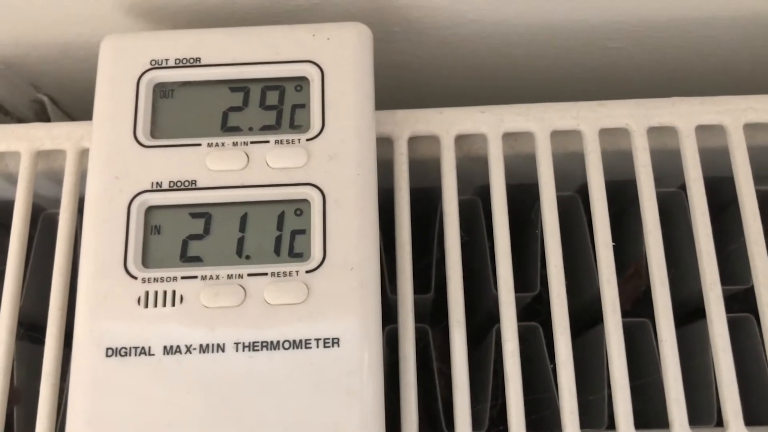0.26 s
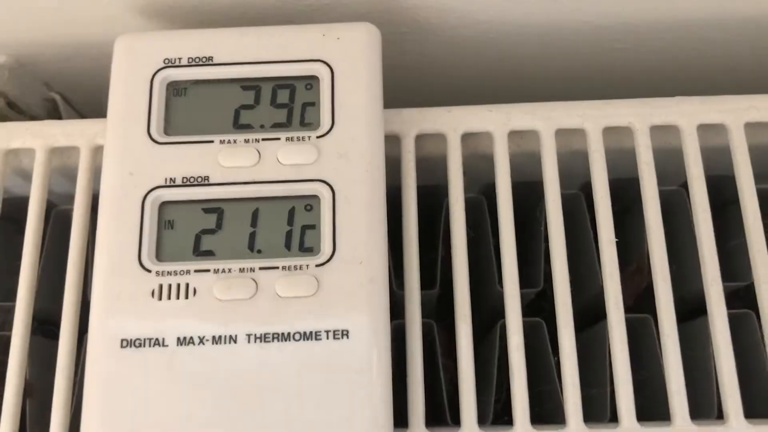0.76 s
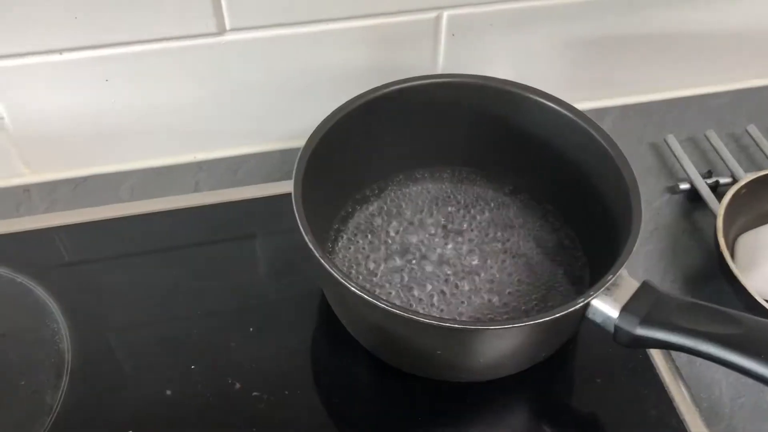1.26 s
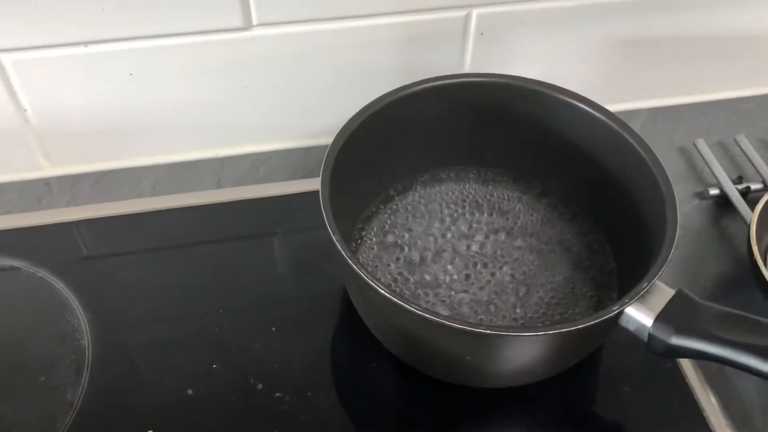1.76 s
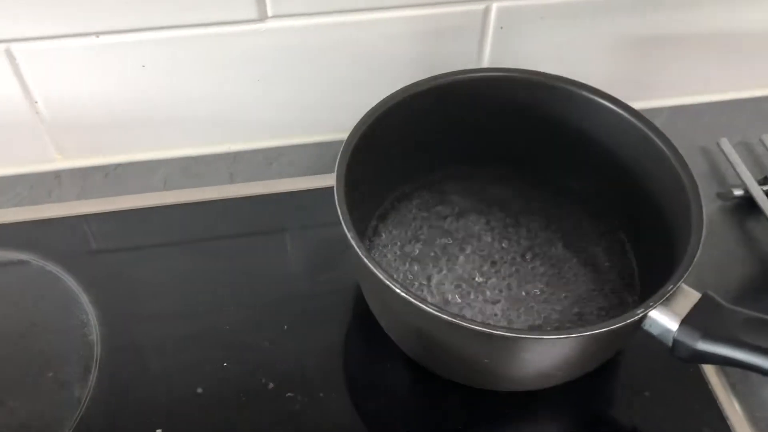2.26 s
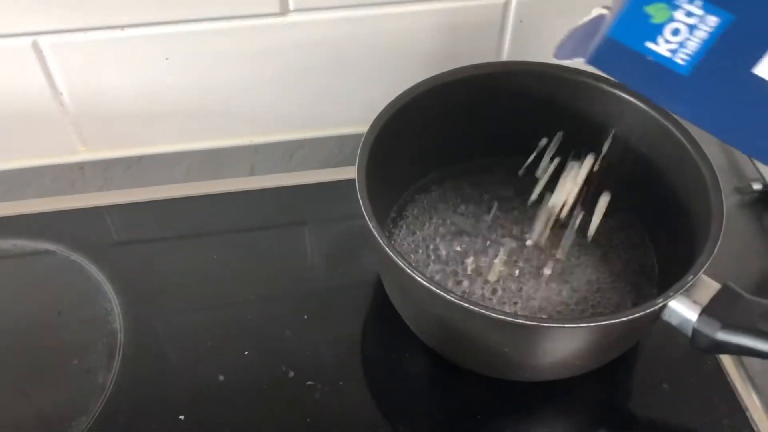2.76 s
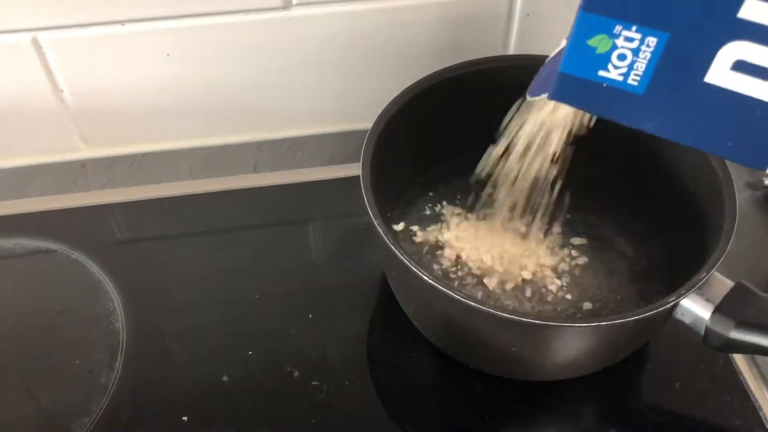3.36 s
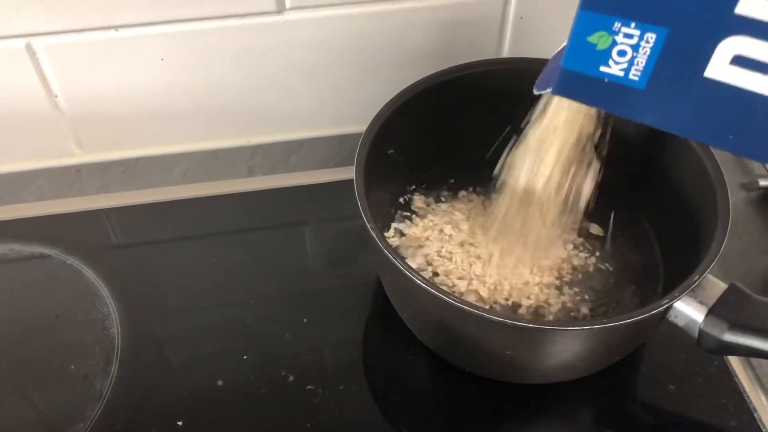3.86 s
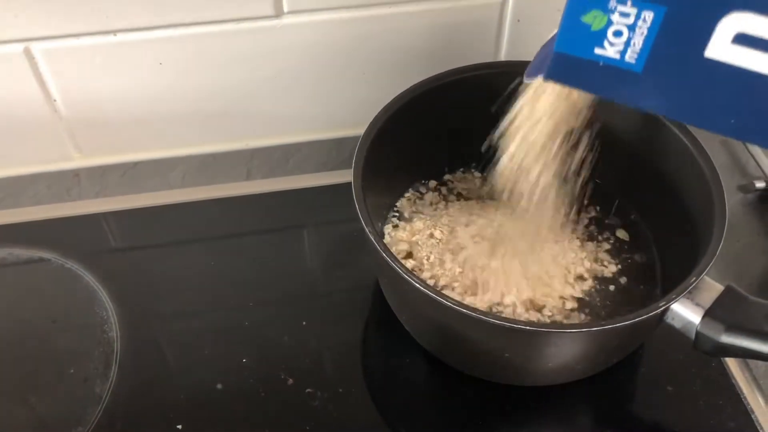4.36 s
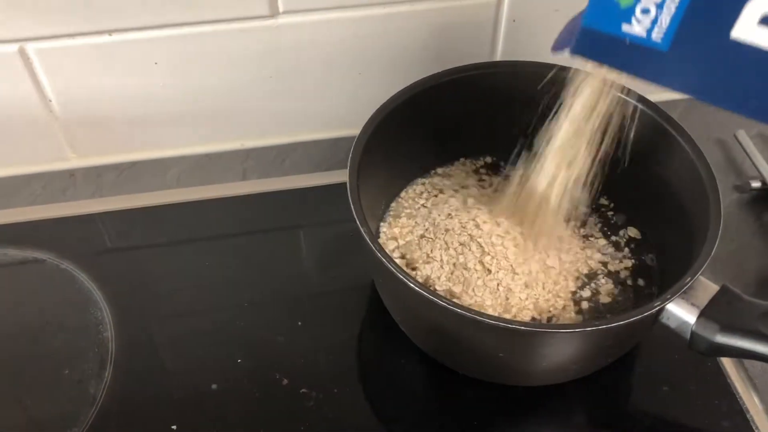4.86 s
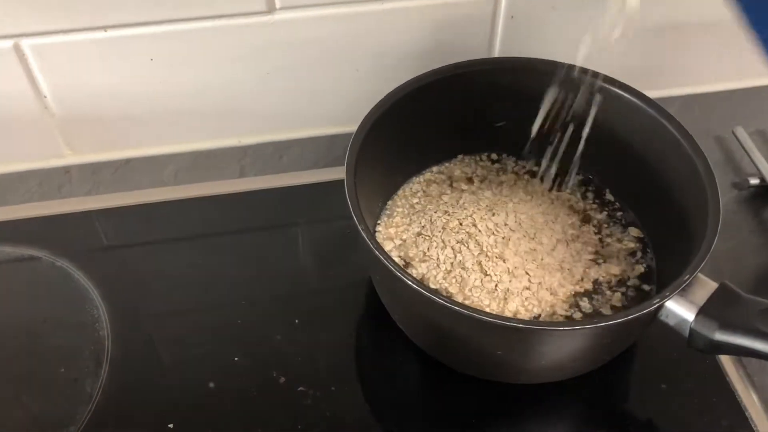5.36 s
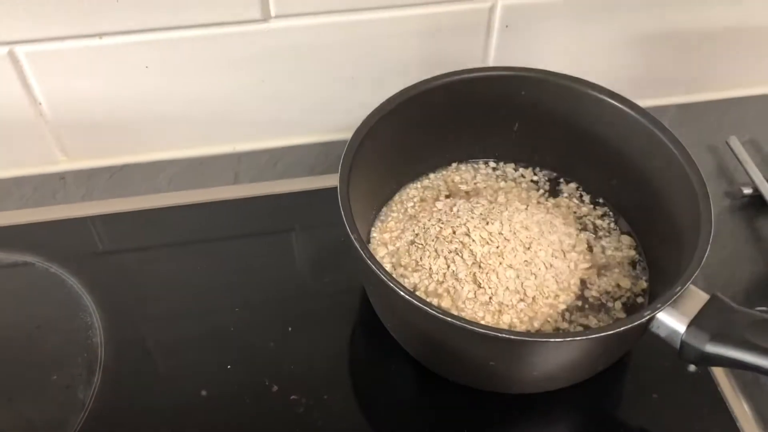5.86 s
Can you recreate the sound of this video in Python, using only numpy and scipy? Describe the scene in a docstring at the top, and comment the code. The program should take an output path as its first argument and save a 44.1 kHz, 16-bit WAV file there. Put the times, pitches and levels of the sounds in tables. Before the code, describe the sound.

Dry oats slide and rustle in a cardboard carton, pour hissing and pattering into a pan of simmering water, then thin to stray clicks.

```python
"""Quiet room air and faint handling knocks come first; the level dips briefly, and a pan rumbles on a hob.
Rolled oats slide in a cardboard carton as it is lifted and tipped, stream into the saucepan of water with
knocks and ticks, and slide back as the carton is righted. Flakes are crowds of tiny cracks and rings,
knocks are damped tones, ticks are noise bursts and the simmer is filtered noise, grains and bubbles.
A small kitchen answers with a short tail that shifts as the hand-held microphone drifts."""
import sys
import numpy as np
from scipy import signal
from scipy.fft import rfft, irfft, next_fast_len
from scipy.io import wavfile
from scipy.ndimage import map_coordinates

SR = 44100
rng = np.random.default_rng(int(sys.argv[2]) if len(sys.argv) > 2 else 0)


def wav_out(sig):
    """Save sig, one row per channel (or a flat mono array), as 16-bit PCM at SR to the path in sys.argv[1]."""
    wavfile.write(sys.argv[1], SR, np.round(np.clip(np.atleast_2d(sig).T, -1, 1) * 32767).astype(np.int16))


N = 269892
TOP_HZ = 15800  # upper band limit

# colour of dull blows and surface bubbles: freq_hz, density_db (per Hz)
KNOCK_BODY = [(30, -63), (80, -2), (150, 3), (300, 0), (700, 5), (1200, -6.5), (2500, -7), (8000, -21)]
# colour of flakes running over the carton's lip: freq_hz, density_db (per Hz)
HISS = [(40, -57), (1500, -6), (3000, -3.5), (4300, -0.5), (5200, -1.5), (6500, 1), (8300, -0.5),
        (10000, -2.5), (12000, -5), (15500, -5)]
# resonances of the air in the pan: freq_hz, width_hz, lift_db
PAN_MODES = [(388, 40, 5), (665, 50, 4), (1050, 70, 6), (1270, 60, 2), (1460, 80, 3), (2780, 160, 4),
             (3330, 100, 3), (3750, 280, 3), (6100, 180, 2)]
# flow of oats over the lip, a trickle, a full stream, then thinning: time_s, level_db
FLOW = [(2.581, -58), (2.9, -45), (3.11, -46), (3.22, -39.5), (3.68, -40), (4.03, -44), (4.92, -47.5),
        (5.25, -48.5), (5.35, -63.5)]


def amp(db):
    """Decibels to gain."""
    return 10 ** (np.asarray(db) / 20)


def unit(x):
    """Scale to rms 1."""
    return x / np.sqrt(np.mean(x ** 2) + 1e-20)


def along(points, hz):
    """Read (freq_hz, value) points on a log frequency axis."""
    freq_hz, value = np.transpose(points)
    return np.interp(np.log(hz + 1), np.log(freq_hz), value)


def colour(x, spectrum, modes=()):
    """Minimum-phase filter: a broad spectrum with resonances on top; white input keeps its power."""
    m = next_fast_len(N + 8192) * 2
    hz = np.fft.rfftfreq(m, 1 / SR)
    db = along(spectrum, hz)
    for freq_hz, width_hz, lift_db in modes:
        db = db + lift_db / (1 + (2 * (hz - freq_hz) / width_hz) ** 2)
    # folding the cepstrum onto positive time makes the filter causal
    cepstrum = irfft(np.log(unit(amp(db))))
    cepstrum[1:m // 2] *= 2
    cepstrum[m // 2 + 1:] = 0
    return irfft(rfft(x, m) * np.exp(rfft(cepstrum)))[:N]


def wobble(rate):
    """A smooth random curve, rate knots a second."""
    knots = rng.standard_normal(int(N * rate / SR) + 4)
    return map_coordinates(knots, [np.arange(N) * rate / SR])


def scatter_sounds(start, sounds):
    """Sum a row of sounds, each from its own start sample, and scale to rms 1."""
    where = start + np.arange(sounds.shape[1])
    return unit(np.bincount(where.ravel(), sounds.ravel(), N)[:N])


def grains(rate, spread_db, life, pitched):
    """Tiny contacts, each a crack (life in s) plus a longer ring at its own pitch; pitched is the ring's power share."""
    count, t = int(rate * N / SR), np.arange(SR // 125) / SR
    start, pitch, phase = rng.random((count, 3)).T[:, :, None]
    size = amp(spread_db * np.minimum(rng.standard_normal((count, 1)), 2))
    share = np.clip(pitched, 0, 1)
    ring = unit(np.sin(2 * np.pi * (pitch * TOP_HZ * t + phase)) * np.exp(-t / (2 * life)))
    crack = unit(rng.standard_normal((count, len(t))) * np.exp(-t / life))
    contact = size * (np.sqrt(share) * ring + np.sqrt(1 - share) * crack)
    return scatter_sounds((start * N).astype(int), contact)


def bubbles(rate, centre_hz, scatter, cycles):
    """Small bubbles: each rings for a few cycles, rising slightly in pitch; rms 1."""
    count, t = int(rate * N / SR), np.arange(SR // 30) / SR
    radius, strength = rng.standard_normal((count, 2)).T[:, :, None]
    turns = centre_hz * np.exp(-scatter * radius) * t
    size = amp(2.3 * np.minimum(strength + radius, 2))  # big bubbles are low and loud
    tone = np.sin(2 * np.pi * turns * (1 + 3 * t))
    ring = size * tone * np.exp(-turns / cycles) * (1 - np.exp(-2 * turns))
    return scatter_sounds(rng.integers(N, size=(count, 1), dtype=int), ring)


def add(track, s, sound):
    """Mix a sound into a track at time s."""
    part = track[round(s * SR):][:len(sound)]
    part += sound[:len(part)]


def room_air():
    """Steady noise of the quiet room, strongest in the bass."""
    # freq_hz, density_db (per Hz)
    air_spectrum = [(15, -55), (28, -22), (48, -4), (75, -1), (110, 2), (200, -7.5), (380, -10),
                    (560, -18.5), (800, -24), (1500, -29.5), (4000, -34), (15500, -40)]
    return amp(-57) * unit(colour(rng.standard_normal(N), air_spectrum))


def kitchen(x):
    """Tiled walls answer with a short tail that varies with pitch and shifts as the hand-held microphone drifts."""
    # decay of the room: freq_hz, t60_s
    decay = [(150, 0.2), (1500, 0.13), (6000, 0.074), (15000, 0.27)]
    sway_hz = 0.3994  # slow sway of the microphone
    hz, t, z = signal.stft(rng.standard_normal((2, SR // 2)), SR, nperseg=256)
    fading = z * amp(-60 * t / along(decay, hz)[:, None])
    tails = signal.istft(fading, SR, nperseg=256)[1]
    answers = []
    for tail in tails:
        delayed = np.pad(tail, (SR // 400, 0))  # 2.5 ms before the first reflection
        answers.append(signal.fftconvolve(x, delayed / np.linalg.norm(tail))[:N])
    here, there = answers
    drift = 2 * np.pi * sway_hz * np.arange(N) / SR
    return np.cos(drift) * here + np.sin(drift) * there


def simmer():
    """Vapour bubbles collapse on the pan's bottom and drum on the hob; others blip at the surface."""
    # rumble through the hob: freq_hz, density_db (per Hz)
    rumble_spectrum = [(20, -40), (45, -23), (70, -14.5), (95, 1), (125, 4.5), (155, -6), (220, -12.5),
                       (400, -39.5)]
    # murmur of collapsing bubbles: freq_hz, density_db (per Hz)
    murmur_spectrum = [(30, -33), (100, -12.5), (180, 0), (270, -2), (400, -3.5), (560, -15.5),
                       (900, -12.5), (2000, -20), (8000, -51)]
    # the pan on the glass top: freq_hz, width_hz, lift_db
    hob_modes = [(107.7, 57, 3.5)]
    # the even simmer surges now and then: peak_s, half_length_s, rumble_lift_db, murmur_lift_db
    surges = [(1.025, 0.014, 8, 0.5), (1.883, 0.064, 1, 6), (2.16, .07, 2, 2.5), (2.638, 0.2, 1.5, 2.5),
              (3.055, 0.023, 5, 6), (5.31, 0.096, 6.5, 2.5), (5.494, 0.082, 5.5, 8), (5.858, 0.22, 6.5, 9)]
    t = np.arange(N) / SR
    rumble_db, murmur_db = np.full(N, -47.0), np.full(N, -51.5)
    for peak_s, length_s, rumble_lift_db, murmur_lift_db in surges:
        swell = np.exp(-((t - peak_s) / length_s) ** 2)
        rumble_db += rumble_lift_db * swell
        murmur_db += murmur_lift_db * swell
    boom = unit(colour(rng.standard_normal(N), rumble_spectrum, hob_modes))
    pops = unit(colour(grains(rate=900, spread_db=1.0, life=0.0014, pitched=0), murmur_spectrum))
    blips = unit(colour(bubbles(rate=170, centre_hz=525, scatter=0.481, cycles=3.3), KNOCK_BODY))
    return amp(rumble_db) * boom + amp(murmur_db) * (amp(-1.0) * pops + amp(-6.5) * blips)


def knocks(t60=0.024, thump_db=-6, scuff_db=3, scuff_t60=0.03):
    """A few damped cycles over a lower thump, with a short dull scuff."""
    # dull knocks and plops from handling, the carton and the pan: start_s, level_db, pitch_hz
    blows = [(0.679, -46, 340), (0.765, -46, 270), (1.874, -38, 600), (2.11, -28.5, 264), (2.131, -29, 263),
             (2.205, -30, 262), (2.23, -31.5, 340), (2.615, -31, 210), (2.652, -34.5, 275),
             (2.9, -28.5, 385), (3.045, -29, 382), (3.382, -27, 282), (3.611, -26, 396), (3.696, -28, 403),
             (4.235, -28, 484), (4.312, -26, 465), (5.108, -29.5, 420), (5.138, -27.5, 420),
             (5.465, -31, 228), (5.784, -33, 443), (5.868, -34, 754), (6.085, -25.5, 127)]
    out, t = np.zeros(N), np.arange(SR // 8) / SR
    onset = 1 - np.exp(-t / 0.00088)
    for start_s, level_db, pitch_hz in blows:
        ring = np.sin(2 * np.pi * pitch_hz * t) * amp(-60 * t / t60)
        thump_hz = pitch_hz * rng.uniform(0.436, 0.85)
        thump = amp(thump_db - 60 * t / 0.035) * np.sin(2 * np.pi * thump_hz * t)
        scuff = amp(scuff_db - 60 * t / scuff_t60) * rng.standard_normal(len(t))
        add(out, start_s, amp(level_db - 9.5) * (ring + thump + scuff) * onset)
    return colour(out, KNOCK_BODY)


def heap():
    """Gains of board and flakes: each slide gathers speed and dies away; a skid starts at once."""
    # slides as the carton is lifted, tipped, righted: peak_s, flakes_db, rise_s, fall_s, board_re_flakes_db
    slides = [(0.865, -55.5, .02, .05, 1.5), (1.04, -47.5, 0.13, 0.1, 1), (1.19, -46.5, 0.18, 0.16, -2.5),
              (1.69, -50.5, 0.089, 0.091, 1), (1.87, -50, 0.058, 0.12, -3.5),
              (2.465, -31.5, 0.084, 0.094, -2), (5.49, -56, 0.04, 0.32, 2), (5.98, -44.5, 0.24, 0.17, 5),
              (6.04, -40.5, 0.096, 0.15, -15)]
    # the heap gives way and skids along the board: start_s, flakes_db, length_s, board_re_flakes_db
    skids = [(2.345, -33, 0.019, -0.5), (2.379, -33.5, 0.013, -1), (2.475, -25, 0.0062, 3),
             (2.478, -31.5, 0.011, -14), (5.775, -41, .014, 3), (6.075, -26, 0.017, -9),
             (6.091, -23.5, 0.0061, -6.5), (6.094, -32, 0.062, -8)]
    t = np.arange(N) / SR
    power = np.zeros((2, N))
    for peak_s, level_db, rise_s, fall_s, board_db in slides:
        gain = amp(level_db) * np.exp(-np.maximum((peak_s - t) / rise_s, (t - peak_s) / fall_s))
        power += np.outer([amp(board_db), 1], gain) ** 2
    for start_s, level_db, length_s, board_db in skids:
        gain = amp(level_db) * (t >= start_s) * np.exp(-((t - start_s) / length_s) ** 2)
        power += np.outer([amp(board_db), 1], gain) ** 2
    return np.sqrt(power)


def carton():
    """Flakes rub each other and scrape the cardboard, whose hollow ring changes as it tilts and empties."""
    # scraped cardboard, then rubbing flakes: freq_hz, density_db (per Hz)
    board_spectrum = [(40, -58), (300, -34), (600, -5), (850, -3), (1100, -2), (1500, 0.5), (2100, -4.5),
                      (2800, -13), (5000, -27)]
    flake_spectrum = [(40, -75), (1200, -23), (2200, -2.5), (2900, -0.5), (3900, 1.5), (5000, -2),
                      (6600, -2.5), (9000, -6.5), (12000, -15), (15500, -22)]
    # carton resonances in each pose: freq_hz, width_hz, lift_db
    lifting_modes = [(1470, 200, 6), (2020, 200, 3), (3000, 250, 2)]
    tipping_modes = [(1070, 43, 10), (1344, 240, 6.7), (2040, 250, 5)]
    righting_modes = [(774, 90, 7.8), (1070, 270, 2.2), (3550, 220, 3.8), (5550, 1300, 1.9)]
    tip_s, right_s = 2.15, 5.3  # the carton is tipped, and righted again
    scrape = amp(-2.5) * grains(rate=1500, spread_db=2, life=0.00083, pitched=0.26)
    rustle = amp(-1.5) * grains(rate=2400, spread_db=-1.0, life=0.00088, pitched=0.3)
    board, flakes = heap()
    pose = np.digitize(np.arange(N) / SR, [tip_s, right_s])
    out = np.zeros(N)
    for k, modes in enumerate([lifting_modes, tipping_modes, righting_modes]):
        out += colour((pose == k) * board * scrape, board_spectrum, modes)
        out += colour((pose == k) * flakes * rustle, flake_spectrum, modes)
    return out


def pour():
    """Gains of landing and sliding: both follow the flow, and the heap in the pan cushions the landing."""
    full_stream_db = -39  # landing gain in the bare pan
    patter_grows = 0.24  # dB of patter for each dB of flow
    cushion_db_per_s = 4  # the growing heap softens the landing
    s, level_db = np.transpose(FLOW)
    t = np.arange(N) / SR
    gate = np.clip(1 + np.minimum(t - s[0], s[-1] - t) / 0.05, 0, 1)  # 50 ms fades outside the flow
    sliding = gate * amp(np.interp(t, s, level_db))
    bare_pan = (sliding / sliding.max()) ** patter_grows
    landing = amp(full_stream_db - cushion_db_per_s * (t - s[0])) * bare_pan
    return landing, sliding


def stray_ticks():
    """Lesser clumps land at random while the oats run, their strength following the patter's gain."""
    rate_per_s, over_landing_db, spread_db, hollow_re_crack_db = 7, 13, 3, -13.5
    start, end = FLOW[0][0], FLOW[-1][0]
    landing, _ = pour()
    when, strength = rng.random((int(rate_per_s * (end - start)), 2)).T
    s = start + when * (end - start)
    landing_db = 20 * np.log10(landing[(s * SR).astype(int)])
    db = landing_db + over_landing_db + spread_db * (2 * strength - 1)
    return list(zip(s, db, db + hollow_re_crack_db))


def ticks(crack_db=-7, crack_t60=0.019, ring_db=8, ring_t60=0.014):
    """A sharp dry crack of noise, and a short hollow answer."""
    # the clearest dry ticks, a handling click, then clumps striking: start_s, crack_level_db, hollow_level_db
    clear_ticks = [(0.6779, -69, -63), (1.1992, -27, -60), (2.036, -42, -49), (2.1066, -38, -42.5),
                   (2.2271, -33, -46), (2.9398, -31, -37), (3.1415, -28, -35), (3.382, -31, -42),
                   (4.3808, -25.5, -40.5), (4.5414, -27.5, -50), (4.78, -37, -38), (4.8052, -24.5, -42),
                   (4.8226, -27.5, -37), (5.1377, -39, -44), (5.5015, -34.5, -60), (5.8957, -26, -55)]
    cracks, rings, t = np.zeros(N), np.zeros(N), np.arange(SR // 20) / SR
    for start_s, level_db, hollow_db in [*clear_ticks, *stray_ticks()]:
        crack = amp(level_db + crack_db - 60 * t / crack_t60) * rng.standard_normal(len(t))
        ring = amp(hollow_db + ring_db - 60 * t / ring_t60) * rng.standard_normal(len(t))
        add(cracks, start_s, crack)
        add(rings, start_s, ring)
    # freq_hz, density_db (per Hz)
    crisp = [(60, -48), (1000, -34), (2500, 11), (4500, 7.5), (8000, 5.5), (15500, -8)]
    hollow = [(40, -17), (350, -26.5), (700, 0.0), (1100, 6), (1800, -1.5), (3000, -6.5), (8000, -20)]
    return colour(cracks, crisp) + colour(rings, hollow)


def stragglers():
    """Single flakes drop from the lip after the stream has stopped and click in the pan, thinning out."""
    thinning_s = 0.43
    since = np.arange(N) / SR - FLOW[-1][0]
    clicks = grains(rate=40, spread_db=3, life=.0003, pitched=.2)
    gain = amp(-63) * (since > 0) * np.exp(-(since / thinning_s) ** 2)
    return colour(gain * clicks, HISS, PAN_MODES)


def stream():
    """Flakes hiss over the carton's lip and patter into the pan; strays click on its wall."""
    # flakes landing in the pan: freq_hz, density_db (per Hz)
    patter_spectrum = [(30, -68), (250, -1), (450, -1.5), (620, -2), (850, -3.5), (1100, 0.5), (1600, -1),
                       (2200, -6), (3800, -4.5), (5200, -7), (9000, -9.5), (15500, -40)]
    landing, sliding = pour()
    impacts = grains(rate=900, spread_db=-1, life=0.0011, pitched=0.36)
    fine = grains(rate=1800, spread_db=2.2, life=0.001, pitched=0.3)
    strays = grains(rate=70, spread_db=3, life=.0003, pitched=.3)
    clumps = amp(1.75 * wobble(55))  # the flow leaves the lip in uneven clumps
    patter = colour(amp(-1.5) * landing * clumps * impacts, patter_spectrum, PAN_MODES)
    hiss = colour(sliding * (amp(-0.5) * clumps * fine + amp(-13) * strays), HISS, PAN_MODES)
    return patter + hiss


def scene():
    """Room air and handling first; the level dips briefly to nothing, then simmer and carton join in."""
    since_dip = np.arange(N) / SR - 0.817
    after_dip = since_dip > 0
    near = after_dip * carton() + stream() + stragglers() + knocks() + ticks()
    dip = np.clip(np.abs(since_dip) / .035, 0, 1) ** 1.3  # 35 ms down, 35 ms up
    mix = near + amp(-4) * kitchen(near) + after_dip * simmer() + room_air()
    return (dip * mix)[None]


def record(dry):
    """Nothing is kept above the band limit."""
    m = next_fast_len(N + 8192)
    in_band = np.fft.rfftfreq(m, 1 / SR) < TOP_HZ
    return irfft(rfft(dry, m) * in_band, m)[:, :N]


dry = scene()
out = record(dry)
wav_out(out)
```